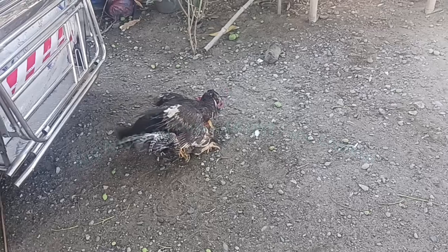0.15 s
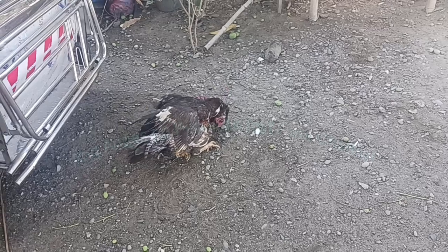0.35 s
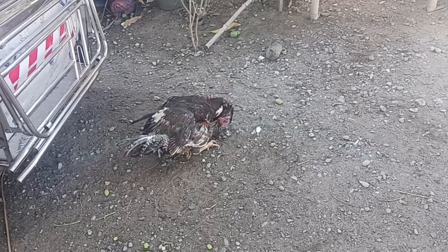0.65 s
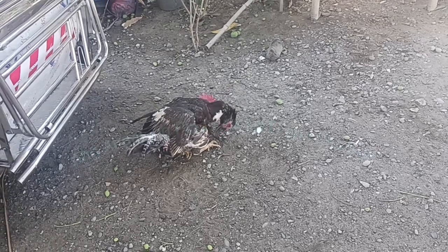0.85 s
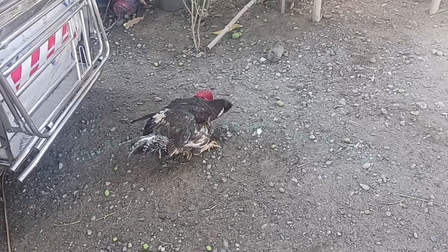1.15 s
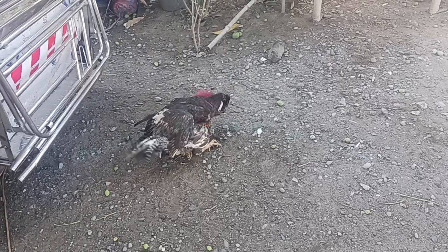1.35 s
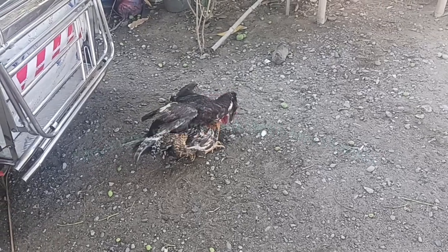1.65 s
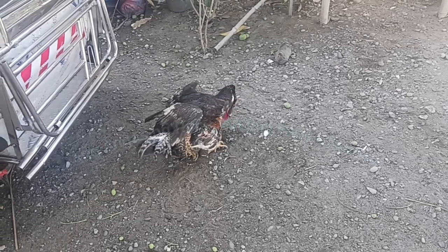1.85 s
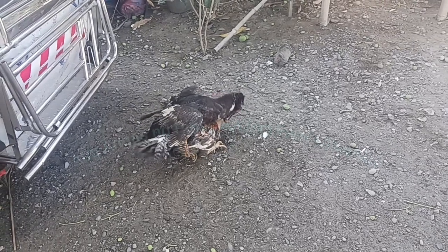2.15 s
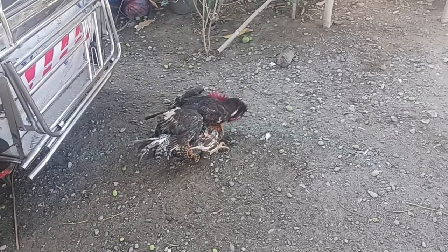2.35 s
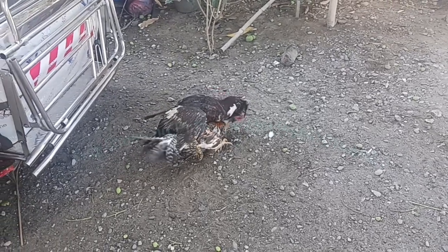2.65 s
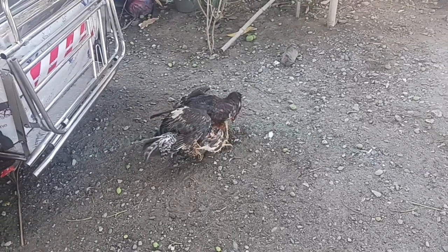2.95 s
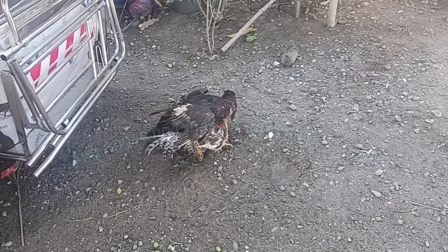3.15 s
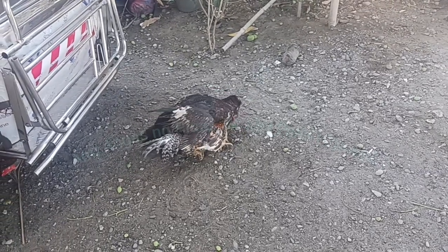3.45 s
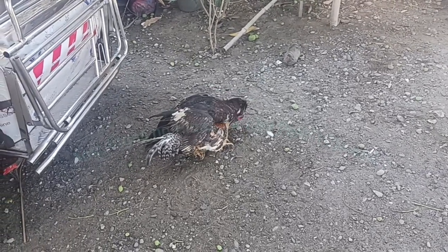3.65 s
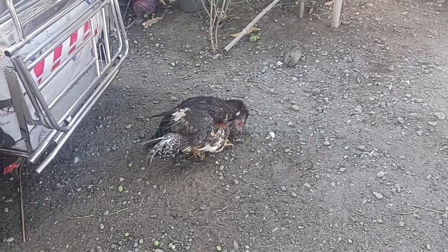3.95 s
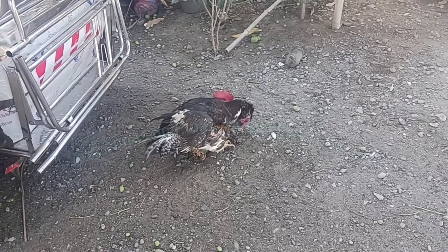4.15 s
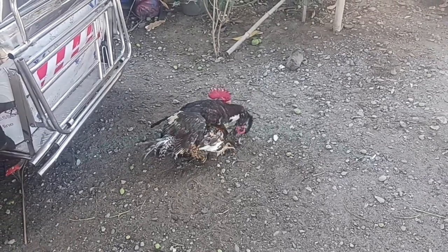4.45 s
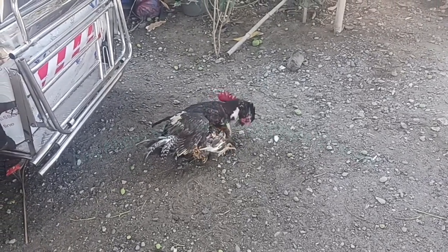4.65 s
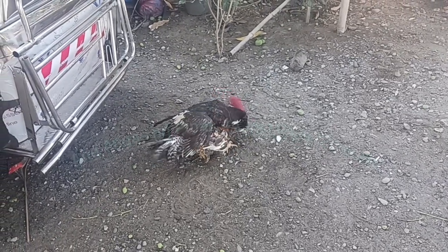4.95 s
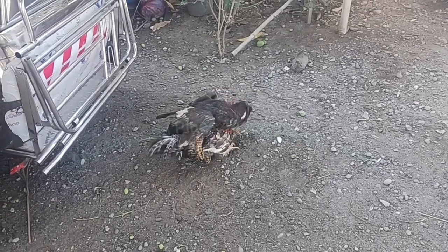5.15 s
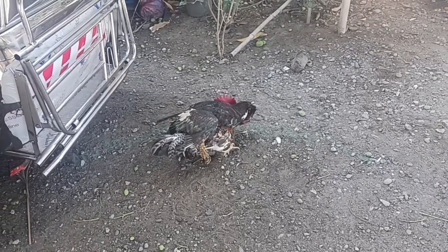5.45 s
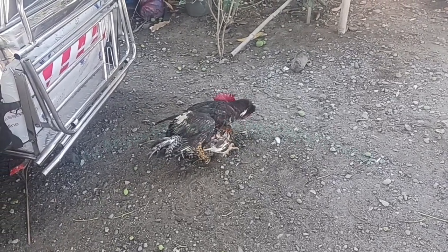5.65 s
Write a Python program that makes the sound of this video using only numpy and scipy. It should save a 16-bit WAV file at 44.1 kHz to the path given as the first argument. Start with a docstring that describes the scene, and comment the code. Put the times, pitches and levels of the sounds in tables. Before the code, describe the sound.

A hen at close to medium distance, slightly right, makes clipped, raspy yelps with soft, almost pure whines between them. Wind puffs and pops low in the left of a stereo phone microphone, mainly in the first half. Soft foliage hiss gradually fades, a distant bird whistles thinly, and pebbles tick briefly under a foot. A short, diffuse outdoor echo follows the calls.

```python
"""A hen lying on gravel in a yard yelps at once, over the hiss of leaves, with thin whines and yelps between.
Her full yelps are sums of partials that turn hoarse; her thin calls and a far bird's whistles are gliding lines.
Leaves are shaped random spectra; a foot scrapes a few stones, which tick, ring and spray grit.
Wind buffets both ports of a phone with low noise bands and pops in the left one by jabs of air."""
import sys
import numpy as np
from scipy import signal
from scipy.fft import rfft, irfft
from scipy.io import wavfile
from scipy.ndimage import uniform_filter1d

SR = 44100
rng = np.random.default_rng(int(sys.argv[2]) if len(sys.argv) > 2 else 0)


def pcm_store(signal):
    """Save signal as 16-bit PCM."""
    levels = np.round(np.clip(np.atleast_2d(signal), -1, 1) * 32767)
    wavfile.write(sys.argv[1], SR, levels.astype(np.int16).T)


N = 255780

# Levels of hen and bird are those of the source, before flutter, placing and echo.
# Yelp syllables: (start [s], length [s], first pitch [Hz], last pitch [Hz], lateness of the glide [exponent],
# peak level of the fundamental [dB], swell to the peak [dB], place of the peak [0-1, kept in .05-.95],
YELP_SYLLABLES = [(0.0, 0.047, 1329, 1161, 1.16, -27.5, 3, 0.76, 3, -30, .1, None),
                  (.35, 0.057, 748.5, 900, 1.38, -17, 17.5, 0.9, -1.5, -3, 0.36, -29),
                  (1.02, 0.034, 749, 626, 0.83, -32.5, 1, 0, -10, 17, 0.2, None),
                  (1.044, 0.063, 685, 894, 0.87, -18.5, 22.5, 0.46, 17.5, -53, 0.2, None),
                  (1.902, 0.031, 804, 878, 1.5, -27.5, 13, 0.58, -27, -7, 0, None),
                  (1.932, 0.035, 902, 1109, 0.49, -28.5, 9, 0.8, 0, -1, 0.1, None),
                  (3.101, 0.032, 1055, 1092, 0.75, -33, 10, 0.65, -6, -9, 0.2, None),
                  (4.945, 0.053, 823, 934, 3.46, -17, 10.5, 0.57, -32, 8.5, 0.6, -39),
                  (5.563, 0.049, 1144, 1268, 0.96, -37, 2, 0.15, -7, -6, 0, None)]
# Filter of the throat on the overtones: (frequency [Hz], gain [dB])
THROAT_FILTER = [(1300, -17.5), (1700, -14), (2400, 0.5), (2900, -17), (3700, -20), (4600, -41)]
YELP_FALL_DB = 9.5  # lost between the peak and the end of a syllable
RASP_FROM, RASP_OVER = 0.584, 0.18  # shares of a syllable: onset of cracking, time to full hoarseness
# Some yelps crack up into a squeak:
FLIP_HZ, FLIP_JUMP_S, FLIP_S, FLIP_FALL_DB, FLIP_OPEN_DB = 1325, 0.0041, 0.037, 8, 2

# Leaf hiss, near the mean of both ports, before a 1.5 dB lift: (time [s], level [dB])
LEAF_LEVEL = [(0.0, -43.5), (2.37, -45), (2.94, -49.5), (5.8, -51)]
# Shape of the hiss spectrum, relative: (frequency [Hz], density [dB per Hz])
LEAF_SPECTRUM = [(60, -47), (200, -5.5), (500, -12.5), (1000, -8.5), (2300, -4), (4500, -7.5),
                 (9000, -14.5), (12500, -14.5), (15500, -17.5)]
# Coherence of the hiss between ports: (frequency [Hz], left-right likeness [0-1])
LEAF_LIKENESS = [(150, 1), (1400, 0.0076)]
# Balance of the hiss: (frequency [Hz], left minus right [dB])
LEAF_BALANCE = [(200, 4), (700, 0), (2400, -6), (4400, -0.5), (8000, 0)]

# Slow swells and lulls of the wind's buffeting, as the mean of both ports: (time [s], level [dB])
BREEZE_LEVEL = [(0.0, -59.5), (.44, -49.5), (.87, -65.5), (1.2, -53), (1.3, -49), (1.6, -38), (2.0, -42.5),
                (2.1, -35.5), (2.34, -37.5), (2.42, -50), (2.58, -62), (3.4, -53), (3.8, -44.5),
                (4.08, -63.5), (4.55, -55.5), (4.8, -44.5), (5.07, -59), (5.8, -64)]
# Short gusts on the same scale: (time of the peak [s], peak level [dB])
GUST_PEAKS = [(.32, -41.5), (0.934, -26.5), (1.053, -23.5), (1.14, -37), (1.459, -25), (1.589, -32),
              (1.79, -22.5), (1.899, -27), (2.349, -33), (2.49, -43.5), (2.671, -30.5), (2.752, -29.5),
              (3.539, -36), (4.76, -38)]
GUST_RISE_DB_PER_S, GUST_FALL_DB_PER_S = 340, 252
# Wind in the right port: (time [s], level [dB])
RIGHT_WIND_LEVEL = [(0, -68), (.9, -64), (1.0, -39), (1.25, -60), (1.55, -30), (1.65, -43), (2.0, -36.5),
                    (2.47, -38), (2.6, -62), (2.78, -64), (2.84, -49), (3.1, -70), (5.8, -68)]
# Wind pops in the left port: (time [s], peak of the push [dB])
LEFT_POPS = [(.918, -17.5), (0.947, -26), (.973, -24), (1.025, -17), (1.061, -16.5), (1.134, -22),
             (1.441, -17), (1.457, -13), (1.769, -28), (1.794, -21), (2.096, -33), (2.149, -28.5),
             (2.235, -20.5), (2.282, -21.5), (2.335, -29), (2.416, -28), (2.662, -29), (2.735, -28.5)]
POP_S, RING_HZ, RING_S = 0.0015, 75, 0.011  # width of the push; pitch and decay of the ring that follows

# Far whistles: (start [s], length [s], first pitch [Hz], place of the bend [0-1], pitch at the bend [Hz],
# last pitch [Hz], level at the bend [dB])
BIRD_WHISTLES = [(0.006, 0.1, 5940, 0.3, 5360, 5220, -40.5), (0.41, 0.13, 6600, 0.48, 5490, 5530, -42.5),
                 (0.51, 0.072, 5500, 0.65, 5780, 5730, -47), (2.018, 0.059, 6460, 0.18, 6330, 6400, -48.5),
                 (2.1, .05, 6730, 0.63, 6940, 6900, -42), (2.144, 0.13, 6680, 0.43, 6210, 6230, -50.5),
                 (5.5, 0.029, 3500, 0.44, 3380, 3350, -49), (2.621, 0.23, 6600, 0.64, 6440, 6160, -54.5),
                 (5.045, 0.285, 6220, 0.4, 6430, 5810, -49.5)]
WHISTLE_SWELL_DB, WHISTLE_FALL_DB = 11, 10.5

# Whines and short, thin, nearly pure yelps: (start [s], length [s], first pitch [Hz], settled pitch [Hz],
# last pitch [Hz], first level [dB], last level [dB])
HEN_THIN_CALLS = [(0.069, 0.091, 1255, 1140, 1024, -44, -35.5), (0.483, 0.31, 1245, 1102, 1016, -33.5, -39),
                  (1.122, 0.19, 939, 907, 907, -38, -44.5), (1.356, 0.32, 838, 846, 842, -37.5, -40.5),
                  (2.086, .055, 1207, 1240, 1170, -39, -40), (3.219, 0.11, 941, 930, 840, -62, -48),
                  (3.644, 0.037, 1042, 1040, 1017, -44.5, -47), (3.673, 0.19, 940, 838, 838, -46, -49),
                  (3.873, 0.07, 905, 905, 910, -53.5, -53), (4.361, 0.024, 1042, 1070, 1082, -43, -42.5),
                  (4.514, 0.062, 964, 955, 968, -57, -47), (4.644, 0.065, 1249, 1340, 1188, -41.5, -45)]
SETTLE_S = 0.0412  # time constant of the pitch
# Gulps, into which whines that run out drop: (time of the low point [s], pitch dropped from [Hz], level [dB])
HEN_GULPS = [(.172, 1030, -32.5), (.818, 1030, -26.5), (1.665, 824, -39.5), (3.34, 855, -46)]
GULP_HZ, DROP_S, DROP_UNDER_DB, GULP_RISE_S, GULP_S, GULP_FALL_DB = 807, 0.019, 13, 0.0072, 0.009, 38

# Clicking stones: (time [s], ring amplitude in the left port before echo [dB], ring pitch [Hz])
STONE_CLICKS = [(.643, -33, 3240), (2.217, -30.5, 3700), (2.223, -25, 4050), (2.2345, -30, 4930),
                (5.2143, -37, 3570), (5.232, -39, 2630)]

# Reverberation of the yard: (frequency [Hz], time to fall 60 dB [s])
YARD_T60 = [(800, 0.25), (2500, 0.24), (6000, 0.24)]
# Gravel and walls return the mids and highs more strongly than the lows: (frequency [Hz], gain [dB])
YARD_GAIN = [(800, -5), (2500, 5.5)]
YELP_LEAD, THIN_LEAD = 21, 15  # samples by which the left port leads; the bird shares the first
EDGE_HZ = 15550  # upper band limit


def gain_of(db):
    """Logarithmic level: decibels to an amplitude ratio."""
    return 10 ** (np.asarray(db) / 20)


def evened(x):
    """Normalisation: scales a signal to rms 1."""
    return x / np.sqrt(np.mean(x ** 2) + 1e-20)


def read(points, hz):
    """Spectral interpolation on a log-frequency axis."""
    f, value = np.transpose(points)
    return np.interp(np.log(hz + 1), np.log(f + 1), value)


def along(curve):
    """Envelope interpolation: a level curve at every sample."""
    return np.interp(np.arange(N) / SR, *np.transpose(curve))


def columns(rows):
    """Envelope interpolation: each column of timed rows at every sample of their span."""
    s, *rest = np.transpose(rows)
    t = np.arange(s[0], s[-1], 1 / SR)
    return [np.interp(t, s, c) for c in rest]


def add(mix, s, sound):
    """Superposition: mixes a sound in from time s."""
    part = mix[max(round(s * SR), 0):][:len(sound)]
    part += sound[:len(part)]


def wander(size, hz):
    """Low-pass noise: smooth chance of rms 1 that moves up to about hz times a second."""
    span = int(SR / hz)
    once = uniform_filter1d(rng.standard_normal(size), span)
    return evened(uniform_filter1d(once, span))


def band(lo_hz, hi_hz):
    """Band-pass filtering: noise of rms 1 between two edges."""
    edges = signal.butter(2, [lo_hz, hi_hz], "bandpass", fs=SR, output="sos")
    return evened(signal.sosfilt(edges, rng.standard_normal(N)))


def yard(x):
    """Reverberation: sparse echoes of random sign, each band dying at its own speed."""
    taps = np.zeros((2, SR // 2))
    slots = np.arange(300, SR // 2 - 80, 80)
    at = slots + rng.integers(0, 80, (2, len(slots)))  # one echo per slot and port
    np.put_along_axis(taps, at, rng.choice([-1., 1.], at.shape), 1)
    hz, t, z = signal.stft(taps, SR, nperseg=256)
    decay = gain_of(-60 * t / read(YARD_T60, hz)[:, None])
    tail = signal.istft(z * decay, SR, nperseg=256)[1]
    tail = tail / np.linalg.norm(tail[0])
    size = tail.shape[1]
    shade = gain_of(read(YARD_GAIN, np.fft.rfftfreq(size, 1 / SR)))
    return signal.fftconvolve(x[None], irfft(rfft(tail) * shade, size), axes=1)[:, :N]


def placed(x, left_db, wet_db, lead=YELP_LEAD):
    """Arrival-time and level difference: the left port hears first but weaker; the yard answers."""
    right = np.concatenate([np.zeros(lead), x[:-lead]])
    return np.array([gain_of(left_db) * x, right]) + gain_of(wet_db) * yard(x)


def yelp_shape(s, length, first_hz, last_hz, late, peak_db, swell_db, at,
               first_open_db, last_open_db, hoarse, flip_db):
    """Register break: pitch eases from first to last as the level swells and falls; a flip may follow."""
    u = np.linspace(0, 1, num=17)
    ease = np.sin(np.pi / 2 * u ** late) ** 2
    hz = first_hz + (last_hz - first_hz) * ease
    at = np.clip(at, .05, .95)
    swell = swell_db * (1 - u / at) ** 2
    fall = YELP_FALL_DB * ((u - at) / (1 - at)) ** 2
    level_db = peak_db - np.where(u < at, swell, fall)
    open_db = first_open_db + (last_open_db - first_open_db) * u
    rough = np.clip(hoarse, 0, 1) * np.clip((u - RASP_FROM) / RASP_OVER, 0, 1)
    rows = list(zip(s + length * u, hz, level_db, open_db, rough))
    if flip_db is not None:
        flip = s + length + FLIP_JUMP_S
        rows += [(flip, FLIP_HZ, flip_db, FLIP_OPEN_DB, 0),
                 (flip + FLIP_S, FLIP_HZ, flip_db - FLIP_FALL_DB, FLIP_OPEN_DB, 0)]
    return rows


def yelp(rows):
    """Source and filter: partials pass the throat; cracking brings half-order lines, rasp and hiss."""
    hz, level_db, open_db, rough = columns(rows)
    size = len(hz)
    turn = 2 * np.pi * np.cumsum(hz * (1 + 0.048 * rough * wander(size, 260))) / SR
    shut = 1 - .5 * rough  # a cracking voice gapes, and the throat colours it less

    def partials(orders):
        """Harmonic synthesis: sums partials of the given orders, weighted by the throat."""
        return sum(gain_of(shut * read(THROAT_FILTER, k * hz)) * np.cos(k * turn + k * k) for k in orders)

    tops = partials(range(2, 7))
    halves = partials(np.arange(1, 5) + .5)
    rasp = 1 + (.4 + rough) * wander(size, 300)  # the overtones always shimmer
    overtones = (1 - 0.66 * rough) * tops + 0.28 * rough * halves
    voice = np.cos(turn) + gain_of(open_db) * overtones * rasp
    # air escapes past slack folds
    air = np.diff(uniform_filter1d(rng.standard_normal(size + 1), size=3))
    voice += 0.25 * rough ** 2 * air
    return 2 ** .5 * gain_of(level_db) * voice * signal.windows.tukey(size, .25)


def leaves():
    """Coloured noise: random short-time spectra with drifting patches, partly coherent between ports."""
    frames, hz = N // 128 + 5, np.fft.rfftfreq(512, 1 / SR)
    a, b, c, d, patches = rng.standard_normal((frames, 257, 5)).T
    patches = evened(uniform_filter1d(uniform_filter1d(patches, 10, 0), 20, 1))
    flicker = evened(uniform_filter1d(rng.standard_normal(frames), 3))
    same = np.clip(read(LEAF_LIKENESS, hz), -1, 1)[:, None]
    left = a + 1j * b
    right = same * left + np.sqrt(1 - same ** 2) * (c + 1j * d)
    lean = gain_of(read(LEAF_BALANCE, hz) / 2)[:, None]
    colour_db = read(LEAF_SPECTRUM, hz)[:, None] + 1.15 * patches + 0.067 * flicker
    z = np.array([left * lean, right / lean]) * gain_of(colour_db)
    hiss = evened(signal.istft(z, nperseg=512, noverlap=384)[1][:, :N])
    # unlike noise in two ports is stronger than its mean, hence the lift
    return gain_of(along(LEAF_LEVEL) + 1.5) * hiss


def blowing():
    """Level envelope: the breeze, or a gust where that is stronger."""
    t, level_db = np.arange(N) / SR, along(BREEZE_LEVEL)
    for s, db in GUST_PEAKS:
        drop_db = np.maximum(GUST_RISE_DB_PER_S * (s - t), GUST_FALL_DB_PER_S * (t - s))
        level_db = np.maximum(level_db, db - drop_db)
    return level_db


def push(t):
    """Pressure pulse: a jab of air at t = 0 with a rounded tip, settling back around it."""
    u = (t / POP_S) ** 2
    return (1 - u) / (1 + u) ** 2


def buffet(level_db, lumpy_db, deep_db=0):
    """Turbulence: eddies boom deeper in gentle wind; harder wind carries relatively stronger small pops."""
    level_db = level_db + lumpy_db * wander(N, 25.6)
    hard = np.clip((level_db + 54.5) / 25, 0, 1)
    upper = band(54.7, 93) * (.5 + .5 * hard)
    deep = gain_of(deep_db + 2.0 - 4.5 * hard) * band(39.8, 85.3)
    boom = (upper + deep) / np.hypot(1, gain_of(deep_db))
    pushes = rng.standard_normal(N) * (rng.random(N) < 45 / SR)  # about 45 a second
    small = evened(signal.oaconvolve(pushes, push(np.arange(-.02, .02, 1 / SR)), "same"))
    return gain_of(level_db) * (boom + gain_of(-9 + 0.41 * (level_db + 25.5)) * small)


def wind():
    """Flow noise at an opening: the left port pops and booms; the right has gusts of its own."""
    left = 2 * buffet(blowing(), 2.0)  # nearly all of the mean comes from this port
    for s, db in LEFT_POPS:
        add(left, s - .02, gain_of(db) * pop())
    return np.array([left, buffet(along(RIGHT_WIND_LEVEL), lumpy_db=4.5, deep_db=11.5)])


def tone(rows, flutter_db, flutter_hz, drift):
    """Frequency and amplitude modulation: a nearly pure line with fluttering level and drifting pitch."""
    hz, level_db = columns(rows)
    turn = 2 * np.pi * np.cumsum(hz * (1 + drift * wander(len(hz), 73.0))) / SR
    level_db = level_db + flutter_db * wander(len(hz), flutter_hz)
    return 2 ** .5 * gain_of(level_db) * np.cos(turn) * signal.windows.tukey(len(hz), .2)


def whistle_shape(s, length, first_hz, at, bend_hz, last_hz, db):
    """Frequency glide: two straight glides that meet at a bend, loudest there."""
    return [(s, first_hz, db - WHISTLE_SWELL_DB), (s + at * length, bend_hz, db),
            (s + length, last_hz, db - WHISTLE_FALL_DB)]


def far_bird():
    """Pure-tone whistling: bent glides with a quick flutter, answered by the yard."""
    bird = np.zeros(N)
    for row in BIRD_WHISTLES:
        add(bird, row[0], tone(whistle_shape(*row), flutter_db=4.5, flutter_hz=110, drift=.005))
    return placed(bird, left_db=-3, wet_db=-7)


def thin_call_shape(s, length, first_hz, settled_hz, last_hz, first_db, last_db):
    """Exponential relaxation: pitch settles quickly while it moves in a straight line to its end."""
    u = np.linspace(0, 1, num=17)
    line_hz = settled_hz + (last_hz - settled_hz) * u
    hz = line_hz + (first_hz - settled_hz) * np.exp(-u * length / SETTLE_S)
    return list(zip(s + length * u, hz, first_db + (last_db - first_db) * u))


def gulp_shape(s, from_hz, db):
    """Downward glide: a drop that lands on a short low note."""
    return [(s - DROP_S, from_hz, db - DROP_UNDER_DB), (s - GULP_RISE_S, GULP_HZ, db - DROP_UNDER_DB),
            (s, GULP_HZ, db), (s + GULP_S, GULP_HZ, db - GULP_FALL_DB)]


def hen():
    """Superposition of two voicings: rich yelps, and nearly pure whines, thin yelps and gulps."""
    yelps, thin = np.zeros((2, N))
    for row in YELP_SYLLABLES:
        add(yelps, row[0], yelp(yelp_shape(*row)))
    shapes = [thin_call_shape(*row) for row in HEN_THIN_CALLS] + [gulp_shape(*row) for row in HEN_GULPS]
    for rows in shapes:
        add(thin, rows[0][0], tone(rows, flutter_db=1.8, flutter_hz=40, drift=.004))
    return placed(yelps, -6.5, -10) + placed(thin, -4, -9, lead=THIN_LEAD)


def stones():
    """Impact: each click is a sharp tick with a short damped ring and a spray of grit."""
    out, t = np.zeros(N), np.arange(1500) / SR
    for s, db, hz in STONE_CLICKS:
        ring = np.sin(2 * np.pi * hz * t) * gain_of(-60 * t / .012)
        grit = signal.lfilter([1, -.6], 1, rng.standard_normal(len(t))) * gain_of(-60 * t / .007)
        add(out, s, gain_of(db) * (ring + grit))
    return np.array([out, .6 * out]) + gain_of(-11) * yard(out)


def pop():
    """Pressure pulse: one eddy pushes or pulls, 20 ms in, and a low ring follows and dies away."""
    t = np.arange(-.02, .06, 1 / SR)
    ring = np.sin(2 * np.pi * RING_HZ * t) * np.exp(-t / RING_S) * (t > 0)
    return rng.choice([-1, 1]) * (push(t) - ring)


def scene():
    """Superposition: hen, leaves, wind, far bird and stones sum in two ports."""
    return hen() + leaves() + wind() + far_bird() + stones()


def record(dry):
    """Band limitation: a steep linear-phase low-pass."""
    lowpass = signal.firwin(1023, EDGE_HZ, window=("kaiser", 11), fs=SR)
    return signal.oaconvolve(dry, lowpass[None], "same")


dry = scene()
out = record(dry)
pcm_store(out)
```